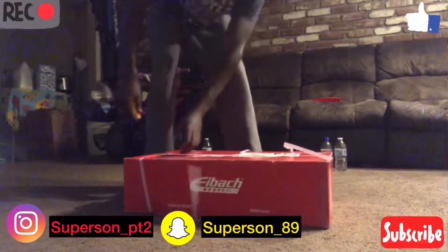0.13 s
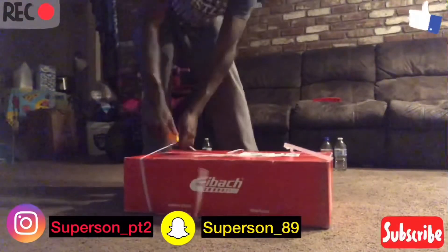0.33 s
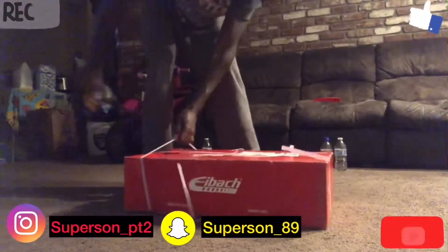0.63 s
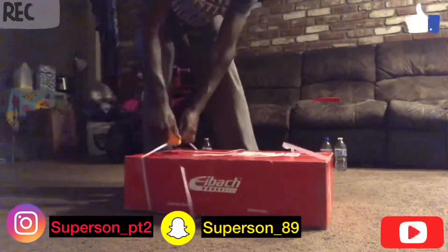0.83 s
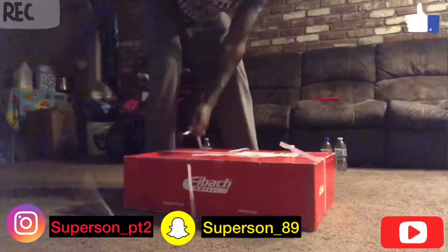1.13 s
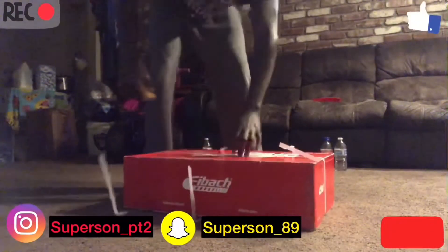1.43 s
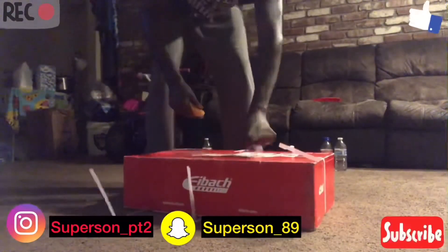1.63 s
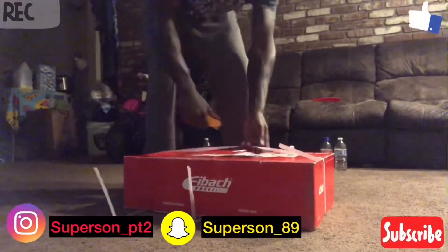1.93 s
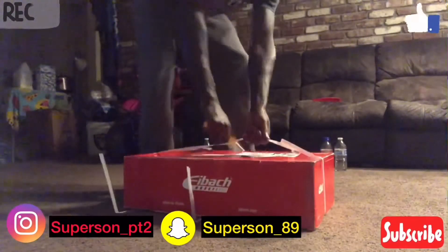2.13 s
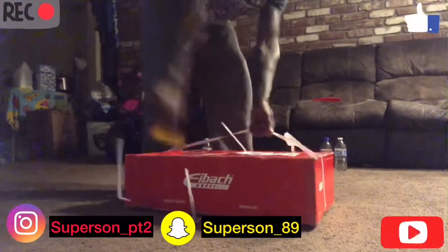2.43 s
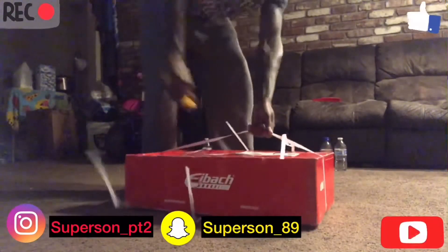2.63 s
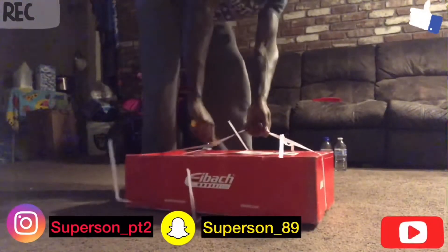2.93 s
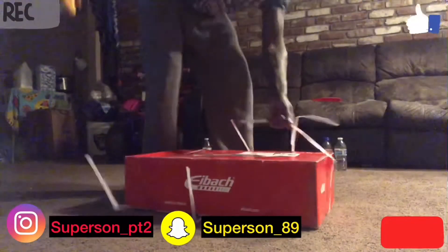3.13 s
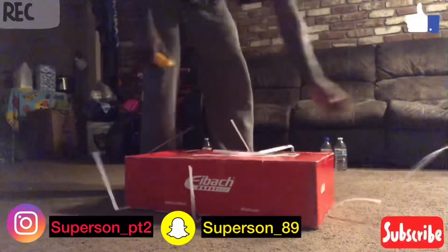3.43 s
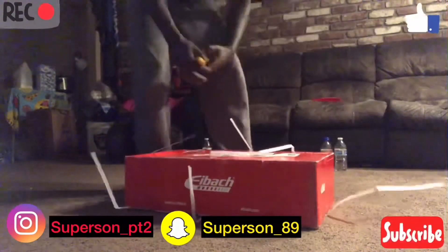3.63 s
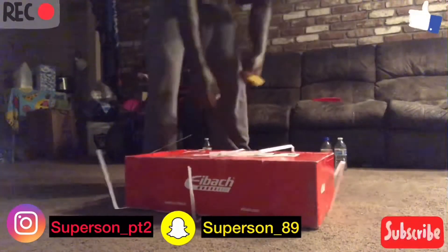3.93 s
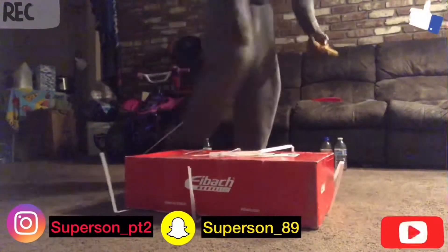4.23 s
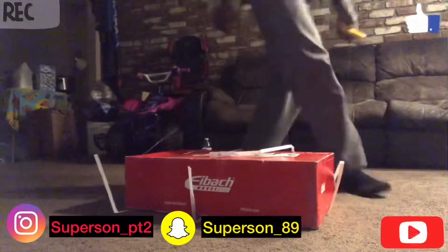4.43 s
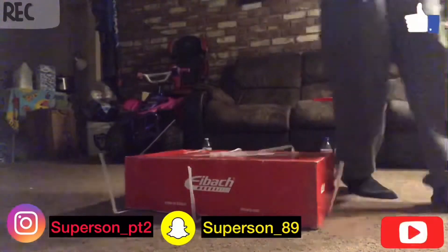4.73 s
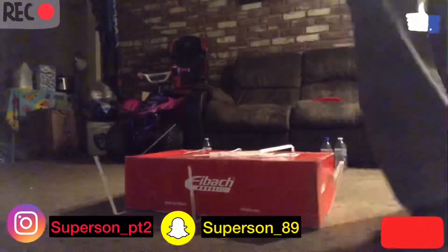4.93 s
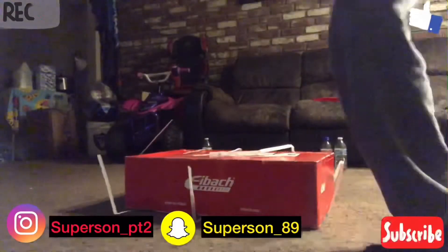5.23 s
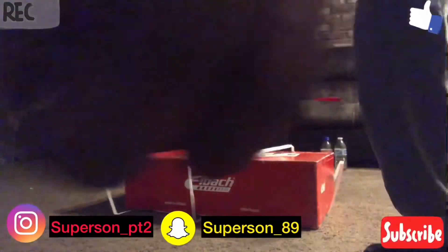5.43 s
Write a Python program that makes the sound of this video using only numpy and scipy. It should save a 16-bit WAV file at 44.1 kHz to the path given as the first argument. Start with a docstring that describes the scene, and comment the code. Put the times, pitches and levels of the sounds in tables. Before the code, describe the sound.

Taut plastic straps on a cardboard box are snipped one by one, cracking loudly with hollow thumps, then soft socked steps and a camera bump.

```python
"""Over quiet room air and a faint hum, hands shift taut plastic straps on a cardboard box; loose ends tap it.
A cutter then bites, straps part with cracks that thump the box and whip over it, and the jaws click open.
Cutting goes on between taps, drags and a soft footfall, until the last loose strap is whisked off the box edge.
At the end come socked steps on carpet, a ticking floor and swishing trousers, and something bumps the camera.
Noise, decaying tones and short clicks make the sources; a synthetic room answers most of them."""
import sys
import numpy as np
from scipy import signal
from scipy.fft import rfft, irfft, next_fast_len
from scipy.io import wavfile
from scipy.ndimage import map_coordinates

SR = 44100
rng = np.random.default_rng(int(sys.argv[2]) if len(sys.argv) > 2 else 0)


def to_wav(sig):
    """Store sig (one row per channel, or 1-D mono) as 16-bit WAV at the path in sys.argv[1].

    Samples outside -1..1 are clipped; the rate is SR.
    """
    pcm = np.clip(np.atleast_2d(sig), -1, 1) * 32767
    pcm = np.round(pcm).astype(np.int16)
    wavfile.write(sys.argv[1], SR, pcm.T)  # frames by channels


N = 245637
T = np.arange(SR // 2) / SR  # time axis of one short sound, in seconds
TOP_HZ = 16000  # upper band limit

# Straps parting: [t/s, crack level/dB, crack tilt/dB per octave, thump level/dB, pitch the thump settles at f/Hz,
# delay of the whipping end t/s, whip rattle level/dB, box heave level/dB,
# slack strap sliding off level/dB (before the cut in friction)]
STRAP_CUTS = [(0.4089, -20.5, -1.4, -13, 490, .015, -23, -27, -46),
              (0.9924, -17.5, -2.2, -11.3, 470, .016, -23, -16.5, -41),
              (2.3073, -17.5, -0.5, -12, 395, .014, -33, -22.5, -52.5),
              (2.9063, -20.5, -0.5, -14, 450, .014, -25.5, -33, -69),
              (2.9336, -18.5, -1.1, -14.5, 370, .011, -31, -20.5, -69)]
# Tones of the hollow box, before random scatter and weighting by pitch: [f/Hz, level/dB]
BOX_MODES = [(148, -1), (207, -1), (254, -7), (321, -3), (400, 1), (433, -5), (507, -3), (552, -2),
             (620, -7), (690, -5), (786, -11), (850, -13), (925, -11), (1084, -17), (1260, -16),
             (1425, -14)]
# Colour of a light plastic contact: [f/Hz, relative level/dB]
TICK_COLOUR = [(200, -19.5), (900, 3), (2500, 0.5), (4000, -1.5), (6500, -5), (10000, -9.5), (15500, -9)]
# Bumps on the camera body: [t/s, level/dB]
CAMERA_BUMPS = [(5.4712, -25.5), (5.525, -43.5), (5.531, -44.5)]


def amp(db):
    """Turn decibels into a gain."""
    return 10 ** (np.asarray(db) / 20)


def unit(x):
    """Scale a lasting sound to rms 1."""
    return x / np.sqrt(np.mean(x ** 2) + 1e-20)


def blow(x):
    """Scale a short sound to the energy of 10 ms at rms 1."""
    return x * np.sqrt(SR / 100 / (np.sum(x ** 2) + 1e-20))


def along(points, hz):
    """Read a curve of (f/Hz, value) points, with frequency on a log axis."""
    f, value = np.transpose(points)
    return np.interp(np.log(hz + 1), np.log(f), value)


def fade(t60):
    """Die away steadily, losing 60 dB in t60 seconds."""
    return np.exp(-np.log(1000) * T / np.maximum(t60, 1e-4))


def colour(x, points):
    """Give x the listed spectrum with a filter that never sounds before its input (minimum phase)."""
    m = 2 * next_fast_len(len(x))
    gain = amp(along(points, np.fft.rfftfreq(m, 1 / SR)))
    cepstrum = irfft(np.log(gain))
    # Folding the cepstrum onto positive times makes the filter minimum phase.
    cepstrum[1:m // 2] *= 2
    cepstrum[m // 2 + 1:] = 0
    response = np.exp(rfft(cepstrum))
    return irfft(rfft(x, m) * response)[:len(x)]


def wobble(rate):
    """Draw a smooth random curve through rate random points a second."""
    knots = rng.standard_normal(int(N * rate / SR) + 4)
    return map_coordinates(knots, [np.arange(N) * rate / SR])


def grains(size, rate):
    """Scatter single-sample impulses of random strength, about rate a second."""
    return rng.standard_normal(size) * (rng.random(size) < rate / SR)


def add(track, s, x):
    """Mix x into the track from s seconds on."""
    start = max(round(s * SR), 0)
    track[start:start + len(x)] += x[:max(N - start, 0)]


def stroke(s, rise, fall):
    """Gain that swells tenfold in rise seconds, peaks at s and drops tenfold in fall seconds."""
    t = np.arange(N) / SR - s
    return 10 ** np.minimum(t / rise, -t / fall).clip(-10, 0)


def room(x, wet_db, build=0.0033, early_db=3, early_t60=.1, direct=None):
    """Add dense early echoes and a weaker, longer tail; the direct sound may have its own colour."""
    # Time the room takes to fall silent: [f/Hz, fall by 60 dB t/s]
    room_t60 = [(190, 0.62), (330, 0.19), (550, 0.125), (2500, 0.19), (8000, 0.17), (15000, .135)]
    hz, t, z = signal.stft(rng.standard_normal(len(T)), SR, nperseg=1024)
    decay = np.exp(-np.log(1000) * t / along(room_t60, hz)[:, None])
    tail = signal.istft(z * decay, SR, nperseg=1024)[1][:len(T)]
    tail *= 1 - np.exp(-(T / build) ** 2)
    tail *= 1 + amp(early_db) * fade(early_t60)
    answer = blow(signal.fftconvolve(x, tail)[:len(T)])
    return blow(x if direct is None else direct) + amp(wet_db) * answer


def click(spectrum, t60, grit_db=-14):
    """A sharp step of force and a short crumble, roughly even across pitch before the object colours them."""
    force = amp(grit_db) * rng.standard_normal(len(T)) * fade(t60)
    force[0] = 1
    # Keep only the timing of the force, with equal strength at every frequency.
    even = irfft(np.exp(1j * np.angle(rfft(force))), len(T))
    even *= T < .02  # stop after 20 ms
    return blow(colour(even, spectrum))


def box(hz, ring_db, wet_db, swell, bend=0.65, spread=1.2, build=0.0046, scatter_db=-1.37, fresh=1.3):
    """The lid flexes briefly, falling in pitch towards hz, and rings mostly the box tones near hz."""
    phase = 2 * np.pi * hz * (T + bend * swell * (1 - np.exp(-T / swell)))
    flex = np.sin(phase) * (T / swell) ** 2 * np.exp(-T / swell)
    # Below 320 Hz the lid moves little air.
    flex = signal.sosfilt(signal.butter(1, 320, "highpass", fs=SR, output="sos"), flex)
    f, db = np.transpose(BOX_MODES)[:, :, None]
    t60 = .155 * (f / 400) ** -.3  # low tones last longer
    nearness = 1 / (1 + (np.log2(f / hz) / spread) ** 2)  # spread in octaves
    strength = amp(db + scatter_db * rng.standard_normal(f.shape)) * nearness
    tones = np.sin(2 * np.pi * (f * T + rng.random(f.shape)))
    ring = np.sum(strength * fade(t60) * tones, axis=0)
    ring *= 1 - np.exp(-(T / build) ** 2)
    ring *= 1 + fresh * np.exp(-(T / 0.041) ** 2)  # cardboard damps large swings faster
    return room(flex, wet_db) + amp(ring_db) * blow(ring)


def friction(scrape, murmur, uneven_db=2.5):
    """Surfaces stick and slip under uneven pressure: scratchy grains in the room over a hollow murmur."""
    # Colour of the murmur: [f/Hz, relative level/dB]
    murmur_colour = [(60, -31), (150, -6), (260, 0), (420, -1), (700, -4), (1100, -12.5), (2000, -31.5),
                     (5000, -45.5)]
    pressure_db = uneven_db * wobble(55)
    scatter_db = 6 * rng.standard_normal(N).clip(-2, 2)  # slips vary widely in strength
    slips = grains(N, rate=1100) * amp(scatter_db)
    one_slip = room(click(TICK_COLOUR, t60=0.0013), wet_db=1)
    scratch = unit(signal.fftconvolve(slips, one_slip)[:N])
    hollow = unit(colour(rng.standard_normal(N), murmur_colour))
    # A fixed cut of 1.5 dB applies to every rub.
    return amp(pressure_db - 1.5) * (scrape * scratch + murmur * hollow)


def background():
    """Noise coloured as quiet room air, with two unsteady tones for an appliance's faint hum and whine."""
    # Household appliance: [f/Hz, level/dB]
    hum_tones = [(118.4, -87.5), (2342, -82)]
    # Colour of the room air: [f/Hz, relative level/dB]
    air_colour = [(20, -48), (52, -36), (72, -16), (150, -4), (330, -12.5), (545, -11.5), (700, -16),
                  (1070, -17.5), (2000, -27.5), (2900, -28), (9800, -36), (16000, -37.5)]
    t = np.arange(N) / SR
    hum = sum(amp(db) * unit(np.sin(2 * np.pi * hz * t + .5 * wobble(4.7))) for hz, db in hum_tones)
    air = unit(colour(rng.standard_normal(N), air_colour))
    return hum + amp(-64.0) * air


def sliding():
    """Ribbed straps rub the lid when handled and dragged, strain before each cut and slide off after it."""
    # Straps dragged over the lid; levels before the cut in friction:
    # [hardest pull t/s, length t/s, scrape level/dB, box murmur level/dB]
    drags = [(0.115, 0.1, -57, -46.5), (0.336, 0.22, -65, -51), (0.86, 0.2, -52, -55.5),
             (1.442, 0.12, -54.5, -44.5), (1.684, 0.15, -56, -47), (1.94, 0.39, -62.5, -58),
             (2.147, 0.081, -47, -36), (3.112, 0.1, -52, -70), (3.185, 0.15, -54, -73),
             (3.638, 0.29, -63, -67.5)]
    rise_share = 0.64  # part of a drag spent building up
    # Hands shift on the box until 2.95 s. Each rub: (gain, scrape dB, murmur dB), before the cut in friction.
    working = np.arange(N) / SR < 2.95
    rubs = [(working, -75, -66)]
    for s, length, scrape_db, murmur_db in drags:
        pull = stroke(s, rise_share * length, (1 - rise_share) * length)
        rubs.append((pull, scrape_db, murmur_db))
    for s, *_, slack_db in STRAP_CUTS:
        strain = stroke(s, rise=.05, fall=.02)  # ever harder until the strap parts
        rubs.append((strain, -61, -44.5))
        slack = stroke(s + 0.15, rise=0.21, fall=0.037)
        rubs.append((slack, -58.5, slack_db))
    # Rubs that overlap add up in power.
    scrape = np.linalg.norm([amp(db) * gain for gain, db, _ in rubs], axis=0)
    murmur = np.linalg.norm([amp(db) * gain for gain, _, db in rubs], axis=0)
    return friction(scrape, murmur)


def taps():
    """Strap ends and hands touch the box: a plastic tick, a broad pat of cardboard and a hollow knock."""
    # Light contacts: [t/s, tick level/dB, knock level/dB (before a 5.5 dB cut), pitch the knock settles at f/Hz]
    contacts = [(0.0305, -56, -30.5, 360), (0.1775, -60, -75, 500), (0.2598, -62.5, -53.5, 390),
                (.885, -69, -49.5, 585.5), (1.3435, -62, -39.5, 420), (1.415, -57, -44.5, 520),
                (1.4722, -36.5, -30.5, 435), (1.6078, -50.5, -36, 380), (1.645, -55.5, -42.5, 515),
                (1.7147, -43, -31, 476), (1.947, -62.5, -49.5, 816), (2.672, -68.5, -44, 450),
                (2.789, -71, -43, 500), (3.567, -58, -50, 815), (3.5998, -52.5, -38.5, 430),
                (3.6518, -57.5, -47.5, 540), (3.911, -68, -52.5, 519), (3.957, -59.5, -62, 610),]
    # Colour of patted cardboard: [f/Hz, relative level/dB]
    board_colour = [(90, -28), (200, 1), (850, 0), (1500, -20), (5000, -40)]
    out = np.zeros(N)
    for s, tick_db, knock_db, hz in contacts:
        tick = room(click(TICK_COLOUR, t60=0.018, grit_db=-12.5), wet_db=0.5)
        add(out, s, amp(tick_db) * tick)
        pat = room(click(board_colour, t60=.02, grit_db=-14), wet_db=1.5)
        knock = box(hz, ring_db=0, wet_db=-5, swell=.001, spread=1.1)
        add(out, s, amp(knock_db - 5.5) * (amp(-5) * pat + knock))
    return out


def cutter():
    """The jaws tick, ring briefly and knock the box as they bite, and click when they spring open."""
    # Jaws biting into a strap: [t/s, click level/dB, box knock level/dB (before a 4.5 dB cut), ring f/Hz]
    bites = [(0.354, -34, -51, 7700), (0.7075, -50, -55, 3250), (0.7699, -33.5, -40.5, 7400),
             (2.1473, -35, -34.5, 7960), (2.6383, -48.5, -50.5, 6140), (2.7522, -34, -43.5, 7800)]
    # Jaws springing open, the last row a light tap instead: [t/s, level/dB]
    releases = [(0.5172, -44.5), (1.12, -43.5), (2.4347, -41.5), (3.0393, -40), (3.1594, -53)]
    # Colours of the bite and the opening spring: [f/Hz, relative level/dB]
    jaw_colour = [(300, -26), (1500, -20.5), (4000, -8.5), (6000, -3), (7500, -2), (9000, -8.5),
                  (11000, -2.5), (13000, -5.5), (15300, 0.5)]
    spring_colour = [(300, -18), (1500, -9), (2500, -1), (4000, -3.5), (6800, -4.5), (8500, 4), (10500, 2),
                     (13000, -1), (15500, -2)]
    out = np.zeros(N)
    for s, click_db, knock_db, hz in bites:
        ring = blow(np.sin(2 * np.pi * hz * T) * fade(0.0096))
        bite = click(jaw_colour, t60=0.013, grit_db=-6.5) + amp(-14) * ring
        add(out, s, amp(click_db) * room(bite, wet_db=-5.5))
        knock = box(hz=570, ring_db=6.5, wet_db=-4.5, swell=.0012, spread=1.0)
        add(out, s, amp(knock_db - 4.5) * knock)
    for s, db in releases:
        opening = click(spring_colour, t60=0.0096, grit_db=-11)
        add(out, s, amp(db) * room(opening, wet_db=-1.5))
    return out


def cuts(whip_width=0.0055, heave_rise=0.0071):
    """Each strap cracks apart and rings, the freed lid thumps, and the flying end slaps and crackles over it."""
    # Tones of each parting strap, one row a cut: [f/Hz of five resonances]
    strap_modes = [
        [2100, 3150, 4600, 10400, 14900],
        [3000, 5050, 6700, 11000, 14800],
        [2380, 4600, 6250, 8500, 10800],
        [1600, 4500, 6400, 7800, 11000],
        [3700, 5050, 8000, 9200, 10800],
    ]
    # Colour of the crack before tilt and resonances: [f/Hz, relative level/dB]
    crack_colour = [(200, -17), (900, -1), (1700, -2), (3000, -1), (4700, -2), (6600, -4), (9000, -6.5),
                    (10800, -4.5), (12500, -7), (15500, -4.5)]
    mode_width_hz, valley_db = 330, -7  # width of the lowest resonance, floor between resonances
    whip_ring_share, whip_tilt_db = .15, -.9  # ringing kept by the flying end, its dulling per octave
    out = np.zeros(N)

    # The whole box heaves at its two lowest tones.
    lowest_hz, next_hz = BOX_MODES[0][0], BOX_MODES[1][0]
    sway = np.sin(2 * np.pi * lowest_hz * T) + .5 * np.sin(2 * np.pi * next_hz * T)
    heave = blow(sway * (fade(0.24) + 4 * fade(0.057)) * (1 - np.exp(-(T / heave_rise) ** 2)))

    f = np.geomspace(crack_colour[0][0], TOP_HZ, SR // 100)
    for cut, modes in zip(STRAP_CUTS, strap_modes):
        s, crack_db, tilt_db, thump_db, hz, whip_at, whip_db, heave_db, _ = cut
        plastic_db = along(crack_colour, f) + tilt_db * np.log2(f)
        bands = 0
        for mode in modes:
            width = mode_width_hz * np.sqrt(mode / modes[0])
            bands = bands + np.exp(-((f - mode) / width) ** 2)
        ringing_db = 20 * np.log10(amp(valley_db) + bands)
        crack = click(np.column_stack([f, plastic_db + ringing_db]), t60=0.007, grit_db=-7)
        # The resonances even out over all directions, so the room hears plain plastic.
        all_round = colour(T == 0, np.column_stack([f, plastic_db]))
        add(out, s, amp(crack_db) * room(all_round, wet_db=-6.5, direct=crack))

        thump = box(hz, ring_db=.5, wet_db=-6, swell=.48 / hz)
        add(out, s + .0008, amp(thump_db) * thump + amp(heave_db) * heave)

        rattle = grains(len(T), rate=3000) * np.exp(-((T - whip_at) / whip_width) ** 2)
        flying_db = plastic_db + whip_tilt_db * np.log2(f) + whip_ring_share * ringing_db
        whip = colour(rattle, np.column_stack([f, flying_db]))
        add(out, s, amp(whip_db) * room(whip, wet_db=-1.0))
        slap = box(hz=680, ring_db=-3, wet_db=-1.0, swell=0.0012)
        add(out, s + whip_at - whip_width, amp(whip_db + 6) * slap)
    return out


def steps():
    """Soft heels give low, padded thuds, and the socks brush the carpet pile as short bursts of noise."""
    # Socked feet on carpet: [t/s, thud level/dB, brush level/dB]
    footfalls = [(.52, -49, -88), (3.715, -59, -62), (4.595, -76, -53.5), (4.647, -66, -64),
                 (4.835, -76, -61), (4.891, -59, -69), (5.1, -51.5, -69)]
    brush_colour = [(500, -18.5), (1900, 5.5), (4000, -7), (15000, -19)]  # f/Hz, relative level/dB
    out = np.zeros(N)
    thud = np.sin(2 * np.pi * 105 * T) * fade(0.05) * (1 - np.exp(-T / 0.016))
    for s, thud_db, brush_db in footfalls:
        noise = rng.standard_normal(len(T)) * fade(0.097) * (1 - np.exp(-T / 0.018))
        brush = blow(colour(noise, brush_colour))
        add(out, s, amp(thud_db) * room(thud, wet_db=-1.0) + amp(brush_db) * brush)
    return out


def yank():
    """The loose strap is whisked over the box edge: a dull rattle that dies away and rings the lid."""
    # The strap pulled free: [t/s, rattle level/dB, knock level/dB, rattle's fall by 60 dB t/s]
    pull = (3.2738, -39.5, -42, .15)
    # Colour of the rattle: [f/Hz, relative level/dB]
    flap_colour = [(150, -12), (500, 5), (1700, -5), (5500, -6), (9000, -22)]
    s, rattle_db, knock_db, t60 = pull
    rattle = blow(colour(grains(len(T), rate=2500) * fade(t60), flap_colour))
    snap = .5 * click(flap_colour, t60=.01)
    knock = box(hz=480, ring_db=8, wet_db=0, swell=.002, spread=.45, build=.012, fresh=.2)
    out = np.zeros(N)
    add(out, s, amp(rattle_db) * room(rattle + snap, wet_db=-2) + amp(knock_db) * knock)
    return out


def trousers():
    """Cloth rubs on cloth once with every stride, swelling and dying away."""
    # Trouser legs swinging past: [loudest t/s, rustle level/dB (before the cut in friction)]
    strides = [(4.35, -69.5), (4.62, -65.5), (4.87, -67), (5.11, -70)]
    swing = sum(amp(db) * stroke(s, rise=0.09, fall=0.18) for s, db in strides)
    return friction(swing, amp(4) * swing)  # the low flap is 4 dB over the rustle


def floor_ticks():
    """The floor gives short, dull clicks as the weight shifts on it."""
    # The floor ticking underfoot: [t/s, level/dB]
    creaks = [(4.308, -57.5), (4.359, -60), (4.646, -51.5), (4.705, -55.5), (4.868, -58.5)]
    # Colour of the ticks: [f/Hz, relative level/dB]
    floor_colour = [(100, -8), (300, 3), (1800, -3), (4000, -21)]
    out = np.zeros(N)
    for s, db in creaks:
        tick = click(floor_colour, t60=.02, grit_db=-12)
        add(out, s, amp(db) * room(tick, wet_db=-4))
    return out


def bumps(rise=0.0027):
    """Dry, dull knocks ring the camera body; the harder the bump, the more it ticks as well."""
    # Tones of the camera body: [f/Hz, relative level/dB, fall by 60 dB t/s]
    body_modes = [(160, -26, 0.023), (512, 3, 0.0064), (850, 4, 0.0075), (1466, 7, 0.0048)]
    tick_colour = [(1500, -7.5), (4000, -4.5), (8000, -6), (15000, -34)]  # f/Hz, relative level/dB
    body = sum(amp(level) * fade(t60) * np.sin(2 * np.pi * hz * T) for hz, level, t60 in body_modes)
    body = blow(body * (1 - np.exp(-(T / rise) ** 2)))
    out = np.zeros(N)
    for s, db in CAMERA_BUMPS:
        tick = click(tick_colour, t60=0.0062)
        # Doubling the decibels makes the tick fade quickly for softer bumps.
        add(out, s, amp(db) * body + amp(2 * db) * tick)
    return out


def camera_rub():
    """Whatever bumps the camera rubs on it from the first knock to the last: an octave-wide band of noise."""
    centre_hz = 1290
    t = np.arange(N) / SR
    touching = (t > CAMERA_BUMPS[0][0]) & (t < CAMERA_BUMPS[-1][0])
    edges_hz = [centre_hz / np.sqrt(2), centre_hz * np.sqrt(2)]
    band = signal.butter(2, edges_hz, "bandpass", fs=SR, output="sos")
    rub = unit(signal.sosfilt(band, rng.standard_normal(N)))
    return amp(-62) * touching * rub


def scene():
    """Add up everything in the room, in one channel."""
    box_work = background() + sliding() + taps() + cutter() + cuts()
    walking = steps() + yank() + trousers() + floor_ticks()
    return (box_work + walking + bumps() + camera_rub())[None]


def record(dry):
    """The camera thins the deep bass, rounds off the highest peaks and cuts steeply above its band limit."""
    bass_cut = signal.butter(2, 62, "highpass", fs=SR, output="sos")  # 62 Hz
    thin = signal.sosfilt(bass_cut, dry)
    held = thin / (1 + np.abs(thin / .93) ** 6) ** (1 / 6)  # peaks stay below .93
    m = next_fast_len(N + SR // 2)
    passband = 1 / (1 + (np.fft.rfftfreq(m, 1 / SR) / TOP_HZ) ** 120)
    return irfft(rfft(held, m) * passband, m)[:, :N]


dry = scene()
out = record(dry)
to_wav(out)
```